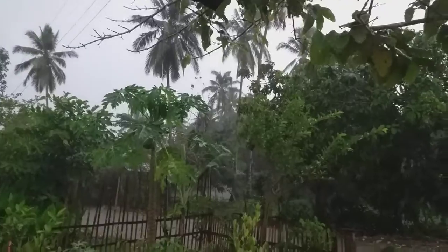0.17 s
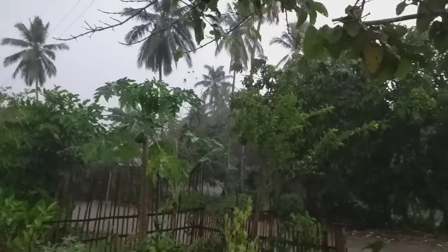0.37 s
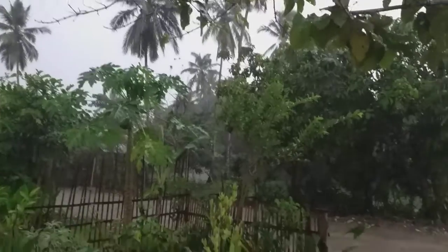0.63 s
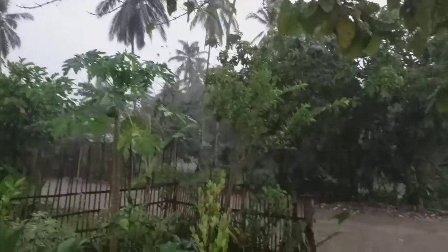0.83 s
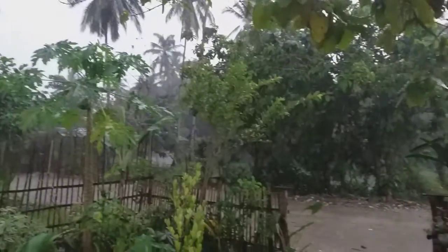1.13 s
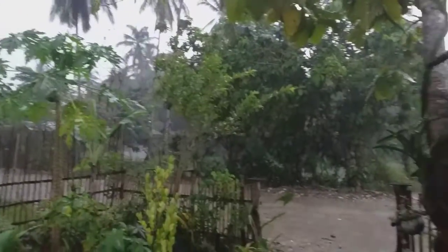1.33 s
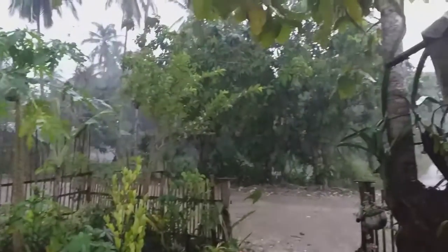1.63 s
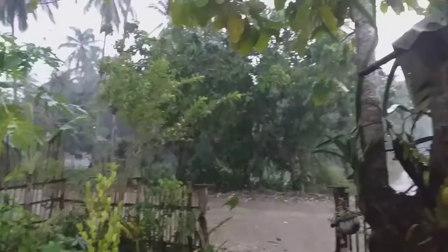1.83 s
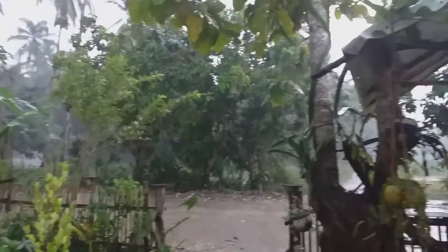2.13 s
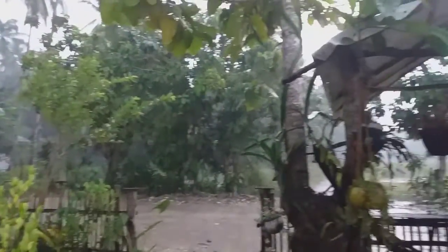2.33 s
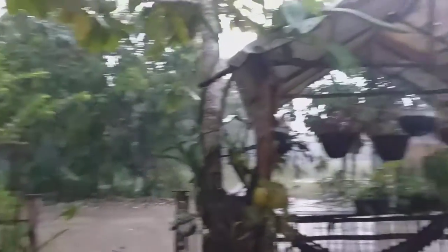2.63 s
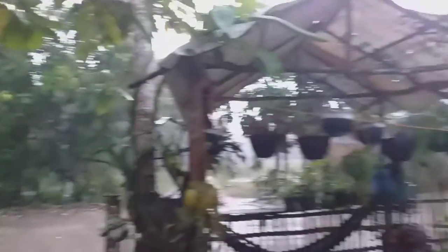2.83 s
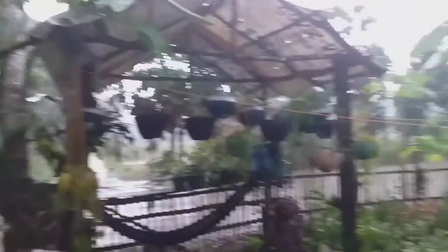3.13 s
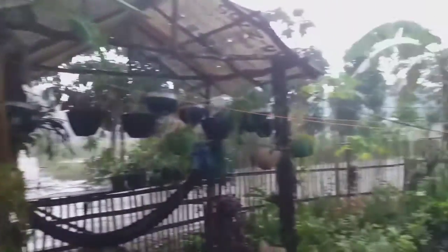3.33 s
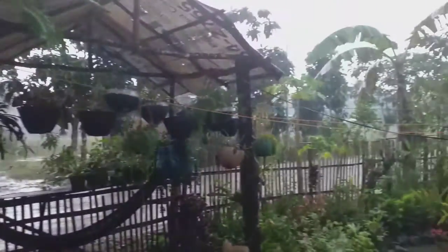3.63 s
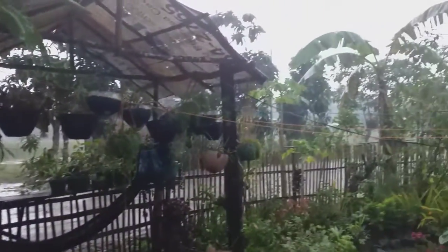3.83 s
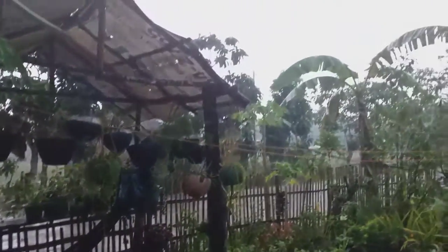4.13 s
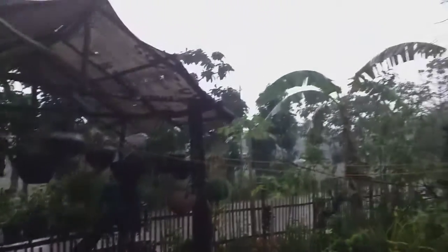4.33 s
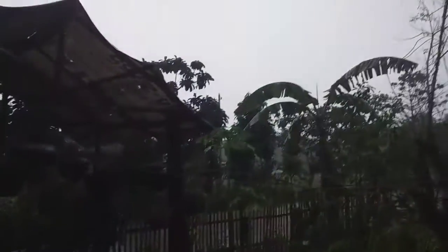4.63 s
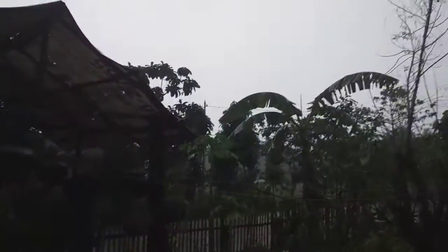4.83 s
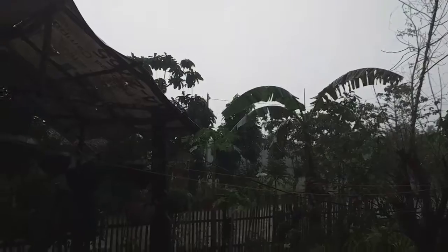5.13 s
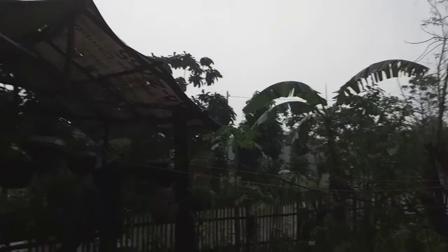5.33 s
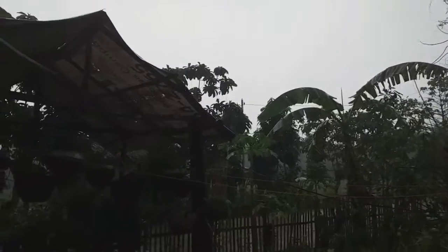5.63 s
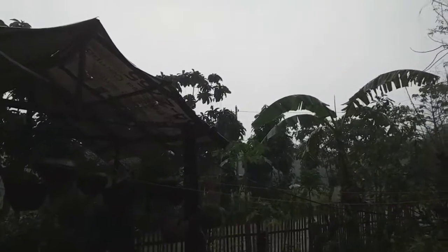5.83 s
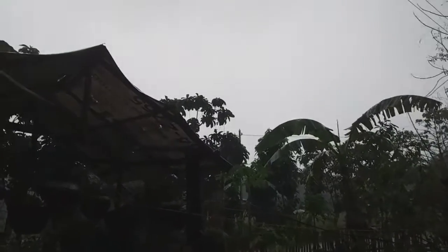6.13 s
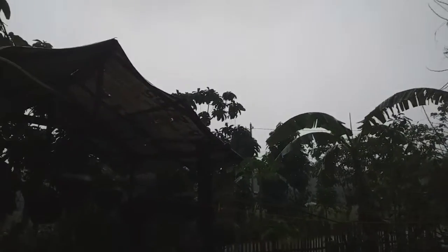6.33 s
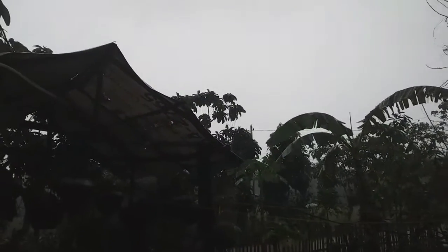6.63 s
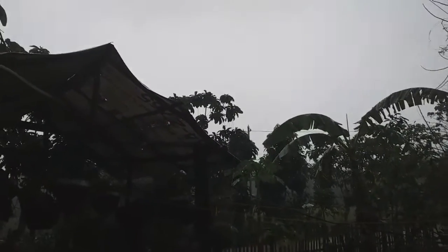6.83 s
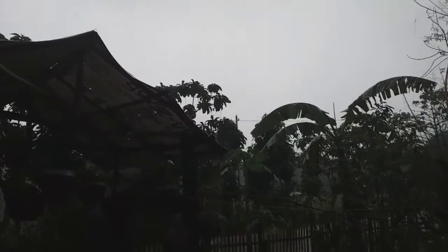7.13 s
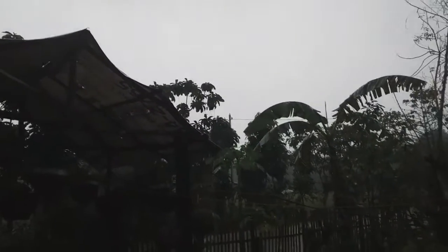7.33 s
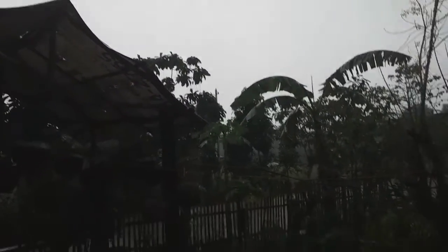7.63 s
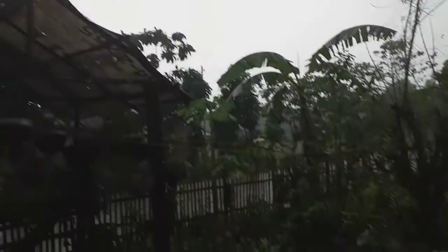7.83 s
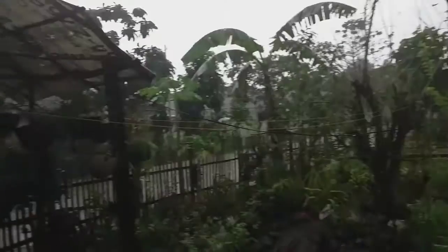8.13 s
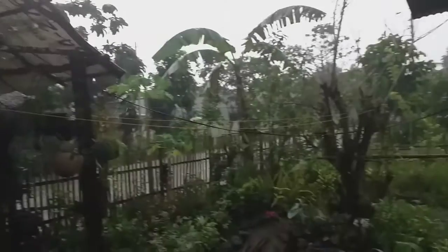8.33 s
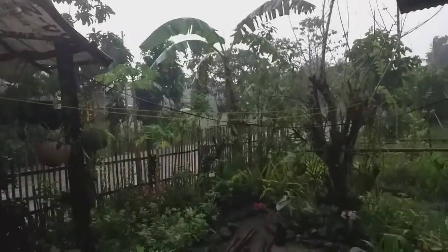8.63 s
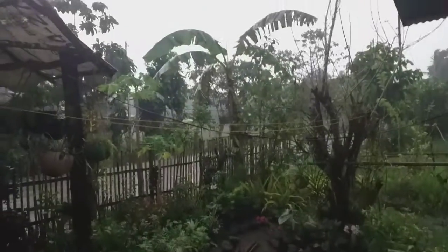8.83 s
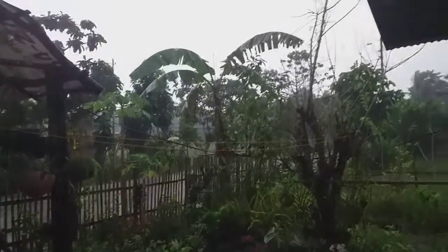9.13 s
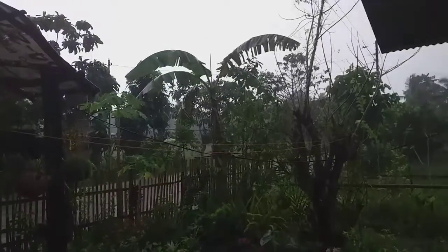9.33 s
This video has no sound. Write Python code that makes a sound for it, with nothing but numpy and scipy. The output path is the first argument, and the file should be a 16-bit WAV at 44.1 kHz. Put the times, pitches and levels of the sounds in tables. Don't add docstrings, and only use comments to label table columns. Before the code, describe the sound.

Continuous heavy rain outdoors, wide noise with a soft low rumble of wind and drummed roofs. It starts bright and spattering from nearby leaves, then turns darker and fuller as the phone turns toward a roofed shelter. Several fat drops knock the phone body, very close and dry, strongest near three and four and a half seconds; the rain sinks briefly after these, then swells back. Essentially mono, slightly muffled phone sound.

```python
import sys
import numpy as np
from scipy import signal
from scipy.fft import rfft, irfft
from scipy.io import wavfile
from scipy.ndimage import uniform_filter1d, minimum_filter1d

SR = 44100
rng = np.random.default_rng(int(sys.argv[2]) if len(sys.argv) > 2 else 0)


def nominal_scale(level):
    x = np.asarray(level, float) / 20
    return 10 ** x


def bounce(signal):
    frames = np.transpose(np.atleast_2d(signal))
    limited = np.clip(frames, -1, 1)
    pcm = np.round(limited * 32767).astype(np.int16)
    wavfile.write(sys.argv[1], SR, pcm)


N = 418509


def rms_one(x):
    return x / np.sqrt(np.mean(x ** 2) + 1e-20)


def in_time(rows):
    s, *columns = np.transpose(rows)
    return [np.interp(np.arange(N) / SR, s, c) for c in columns]


def colour(x, points):
    hz, level_db = np.transpose(points)
    grid_hz = np.maximum(np.arange(4097) * SR / 8192, 1)
    log_gain = np.log(nominal_scale(np.interp(np.log(grid_hz), np.log(hz), level_db)))
    cepstrum = irfft(log_gain)
    cepstrum[1:4096] *= 2
    cepstrum[4097:] = 0
    impulse = irfft(np.exp(rfft(cepstrum)))
    return signal.fftconvolve(x, impulse)[:len(x)]


def band(x, low_hz, high_hz, order=4):
    return signal.sosfilt(signal.butter(order, [low_hz, high_hz], "band", fs=SR, output="sos"), x)


def split(x, hz, kind):
    return signal.sosfilt(signal.butter(2, hz, kind, fs=SR, output="sos"), x)


def drift(rate_hz):
    pole = np.exp(-80 * np.pi * rate_hz / SR)
    noise = rng.standard_normal(N // 40 + 2002)
    slow = signal.lfilter([1], [1, -2 * pole, pole * pole], noise)[2000:]
    slow = slow - uniform_filter1d(slow, size=SR // 120)
    return np.interp(np.arange(N) / 40, np.arange(len(slow)), rms_one(slow))


def drops(per_s, spread_db):
    out = 0
    for low_hz, high_hz in [(20, 2900), (2900, 6500), (6500, 20000)]:
        sizes_db = spread_db * np.minimum(rng.exponential(1, N), 5)
        sizes = nominal_scale(sizes_db) * rng.choice([-1, 1], N)
        impacts = sizes * (rng.random(N) < per_s / SR)
        out = out + band(rms_one(impacts), low_hz, high_hz, order=3)
    return out


# f/Hz, level/dB
PORT_RESPONSE = [(5000, 0), (6000, -5), (7200, -14), (8800, -26.5), (10500, -14), (12500, -9.5),
                 (14000, -14), (15000, -19), (16000, -21)]


def through_port(x):
    return colour(x, PORT_RESPONSE)


# f/Hz, level/dB per Hz
RUMBLE_SPECTRUM = [(25, -58), (50, -18.5), (80, -8), (115, 2), (160, -1.5), (230, -15.5), (330, -21),
                   (500, -30)]


def rumble(level_db):
    lumps = colour(rng.standard_normal(N) * nominal_scale(1.4 * drift(4.2)), RUMBLE_SPECTRUM)
    return nominal_scale(level_db + 1.0) * rms_one(lumps)


# f/Hz, level/dB per Hz
RUSH_SPECTRUM = [(60, -44), (150, -14.5), (224, -5), (460, -2), (680, -1.5), (900, 0), (1540, -2.5),
                 (2100, -5.5), (4050, -8.5), (5300, -12.5), (9000, -14.5), (12500, -10.5), (16000, -16)]


def rush(level_db, drum_db):
    gust = drift(6.3)
    low = split(rng.standard_normal(N), 1800, "low")
    high = split(drops(12000, spread_db=1.17), 1800, "high")
    low = low * nominal_scale(0.55 * gust)
    high = high * nominal_scale(0.1 * gust + 0.34 * drift(26))
    sheet = colour(low + high, RUSH_SPECTRUM)
    drum = signal.sosfiltfilt(signal.butter(2, 520, fs=SR, output="sos"), sheet)
    drum_gain = nominal_scale(drum_db + 1.5) / np.std(band(sheet, 240, 490))
    sheet_gain = nominal_scale(level_db) / np.std(band(sheet, 653, 1860))
    return sheet_gain * (sheet - drum) + drum_gain * drum


# f/Hz, level/dB per Hz
LEAF_SPECTRUM = [(1200, -27.5), (2500, -7.5), (3800, -5), (5000, 0.5), (6000, 0.5), (7500, -4),
                 (12000, -11.5), (14500, -3), (16000, -2)]
EAVE_SPECTRUM = [(900, -31), (1800, -3.5), (2800, 0), (4000, -2.5), (5500, -4), (7500, -9.5), (12000, -16),
                 (16000, -3)]


def patter(rush_db, treble_db):
    turn_to_eave_s, rush_treble_db = 2.45, -4.5
    missing = nominal_scale(2 * treble_db) - nominal_scale(2 * (rush_db + rush_treble_db))
    power = np.maximum(missing, nominal_scale(2 * (rush_db - 20)))
    impacts = drops(6000, spread_db=2.0) * nominal_scale(0.5 * drift(10))
    leaves, eave = [colour(impacts, points) for points in (LEAF_SPECTRUM, EAVE_SPECTRUM)]
    leaves, eave = [v / np.std(band(through_port(v), 3000, 6500)) for v in (leaves, eave)]
    return np.sqrt(power) * np.where(np.arange(N) < turn_to_eave_s * SR, leaves, eave)


# t/s, level/dB, first f/Hz, length/s
FRONT_THUMPS = [(0.029, -20, 220, .0066), (1.2879, -8, 350, 0.0034), (2.546, -16, 255, .006),
                (2.8566, 1.5, 225, 0.0079), (2.895, -22, 300, 0.043), (3.0058, 8.5, 215, 0.0051),
                (3.8685, -17, 280, .007), (4.5489, -7, 300, 0.0032), (4.5582, 7, 217, 0.01),
                (5.54, -28, 250, .01), (5.765, -21, 300, 0.0079), (5.93, -22, 250, .011),
                (7.825, -21, 160, 0.013), (7.9325, 2, 225, 0.0044)]
# t/s, level/dB, first f/Hz, length/s
REAR_THUMPS = [
    (8.2785, -2, 298, .0021),
]


def thumps(table):
    out, t = np.zeros(N), np.arange(round(0.12 * SR)) / SR
    for s, level_db, first_hz, length_s in table:
        pitch_hz = first_hz * (0.34 + 0.88 * np.exp(-t / 0.0037))
        swing = np.sin(2 * np.pi * np.cumsum(pitch_hz) / SR) * (1 - np.exp(-t / 0.00049))
        out[round(s * SR):][:len(t)] += nominal_scale(level_db) * np.exp(-(t / length_s) ** 1.5) * swing
    return out


# t/s, level/dB, brightness f/Hz
STRIKE_TICKS = [(0.0212, -2, 5500), (1.2878, 0, 1900), (2.8561, 0, 1700), (3.0056, 6, 1150),
                (3.8684, -9.5, 3000), (4.5485, 4, 5000), (4.5543, -13, 2000), (4.5572, 7.5, 1200),
                (4.7993, -12, 8000), (7.4628, -16, 9000), (7.9325, -8, 1500), (8.3455, -14, 9000)]


def ticks():
    out, t = np.zeros(N), np.arange(round(0.01 * SR)) / SR
    for s, level_db, bright_hz in STRIKE_TICKS:
        turn = 2 * np.pi * bright_hz * t
        pull = turn * np.exp(1 - turn) * (1.3 - 0.31 * turn)
        out[round(s * SR):][:len(t)] -= nominal_scale(level_db) * pull
    return out


# f/Hz, level/dB
CASE_RESPONSE = [(20, -15), (50, -8), (5000, 5), (8000, -18.5), (11500, 4), (15000, -19)]


def strikes():
    return colour(ticks() + thumps(FRONT_THUMPS) - thumps(REAR_THUMPS), CASE_RESPONSE)


# start t/s, depth level/dB, release t/s
GAIN_DUCKS = [
    (3.0, -6.5, 4.13),
    (4.57, -12.5, 5.68),
]


def ducking_db():
    fall_s, recover_s = 0.3, 0.16
    t, out = np.arange(N) / SR, 0
    for s, depth_db, until_s in GAIN_DUCKS:
        sunk = 1 - np.exp(-np.maximum(t - s, 0) / fall_s)
        out = out + depth_db * sunk * np.exp(-np.maximum(t - until_s, 0) / recover_s)
    return out


# t/s, rush level/dB
RAIN_LEVEL = [(0.0, -23), (0.61, -25), (1.27, -26), (1.8, -28), (2.43, -27.5), (2.75, -25), (4.5, -26),
              (6.1, -22.5), (7.2, -22.5), (7.93, -24), (8.24, -23), (9.49, -24.5)]
# t/s, close drops level/dB over rush, roof drumming level/dB over rush
PHONE_FACING = [(0.0, 7.5, -5.5), (0.16, 5, -9), (1.27, 3, -8), (1.82, 3.5, -8), (2.22, 3, -9.5),
                (2.6, -3.5, -8), (3.2, -2.5, -7), (6.1, -4.5, -6), (8.2, -4, -6), (8.38, 1, -7.5),
                (9.17, -2.5, -6), (9.49, -2.5, -5)]


def scene():
    rush_db = in_time(RAIN_LEVEL)[0] + ducking_db()
    close_db, roof_db = in_time(PHONE_FACING)
    rain = rush(rush_db, rush_db + roof_db) + patter(rush_db, rush_db + close_db)
    mono = through_port(rain) + rumble(rush_db - 16) + strikes()
    return np.tile(mono, (2, 1))


def limiter(x):
    ceiling_db, look_ahead_s, release_db_per_s = -0.3, 0.0065, 1400
    over_db = np.maximum(20 * np.log10(np.abs(x) + 1e-9) - ceiling_db, 0)
    fall_db = release_db_per_s * np.arange(N) / SR
    held_db = np.maximum.accumulate(over_db + fall_db) - fall_db
    span = 2 * round(look_ahead_s * SR / 2) + 1
    ahead_db = -minimum_filter1d(-held_db, size=span, origin=-(span // 2))
    return x * nominal_scale(-uniform_filter1d(ahead_db, size=span, origin=span // 2))


# t/s, centre f/Hz
SIDE_BURSTS = [(.214, 5000), (.214, 6950), (.214, 9000), (.261, 4700), (.261, 10300), (1.261, 6100),
               (1.679, 5500), (1.888, 14100), (3.118, 9000), (3.814, 6350), (4.21, 13800), (5.487, 5200),
               (5.487, 6900), (5.487, 11800), (7.112, 13800), (8.227, 8600), (8.227, 12450), (8.413, 9300),
               (8.413, 12700)]


def side_bursts(mono):
    width_hz = 1550
    side, fade = np.zeros(N), np.sin(np.pi * np.arange(2048) / 2048)
    for s, hz in SIDE_BURSTS:
        at = round(s * SR) - 1024
        part = band(mono[at - 1024:at + 4096], hz - width_hz / 2, hz + width_hz / 2, order=6)
        later = part[1024 + 2048:]
        side[at:at + 2048] += fade * later / np.sqrt(2)
    return np.array([mono + side, mono - side])


def roll_off(x):
    return signal.sosfilt(signal.butter(12, 16240, fs=SR, output="sos"), x)


def record(dry):
    top_cut = signal.ellip(12, 0.5, 80, 15470, fs=SR, output="sos")
    limited = limiter(signal.sosfilt(top_cut, dry[0]))
    mix = side_bursts(limited)
    return roll_off(mix)


dry = scene()
out = record(dry)
bounce(out)
```